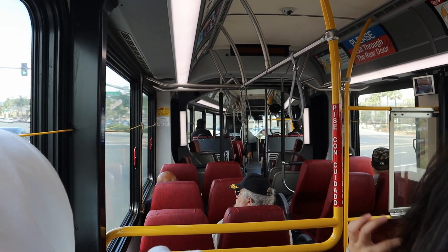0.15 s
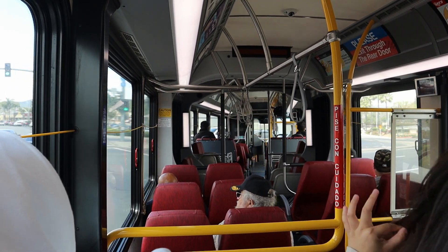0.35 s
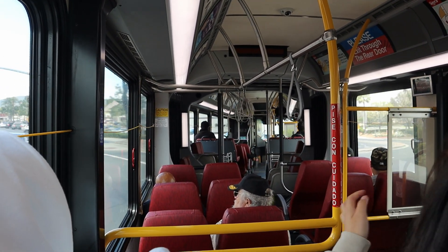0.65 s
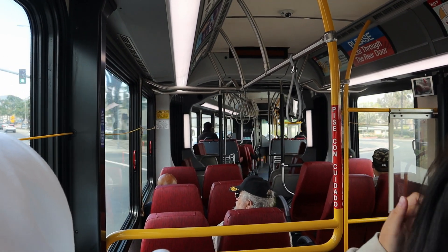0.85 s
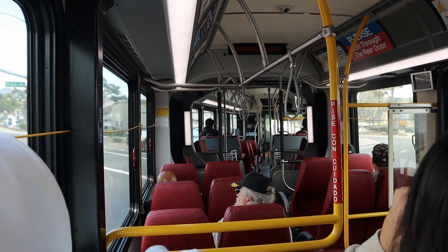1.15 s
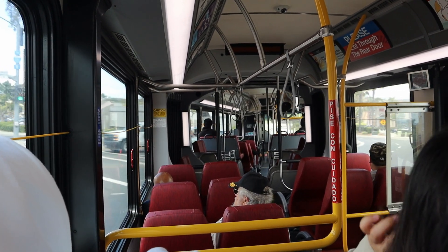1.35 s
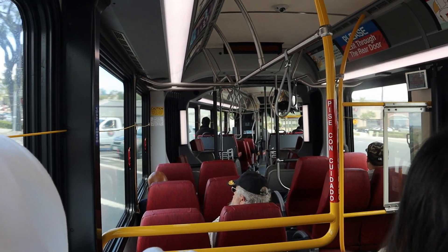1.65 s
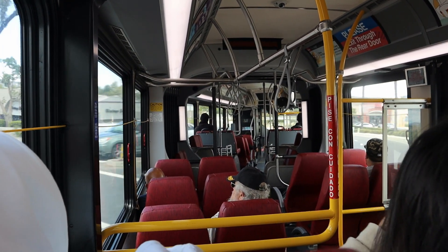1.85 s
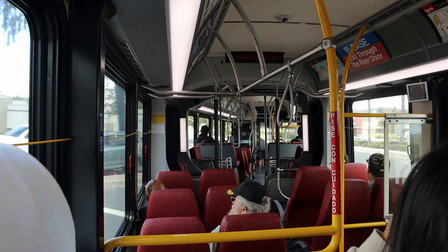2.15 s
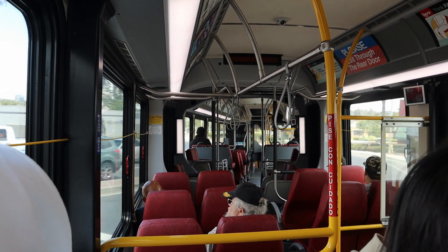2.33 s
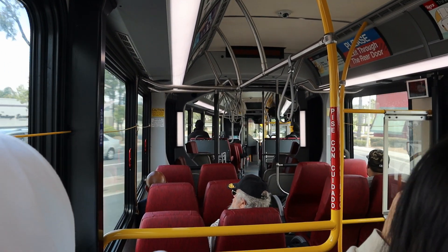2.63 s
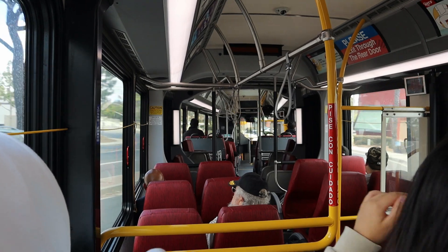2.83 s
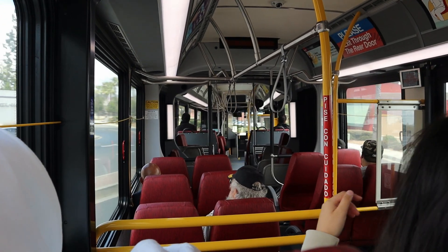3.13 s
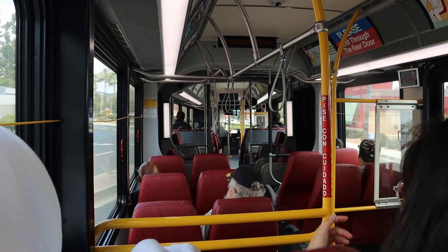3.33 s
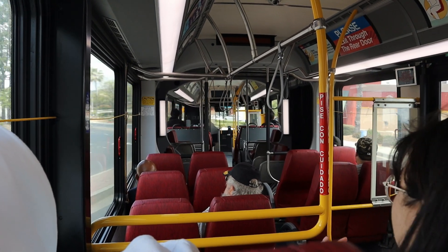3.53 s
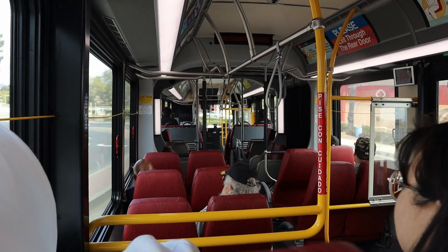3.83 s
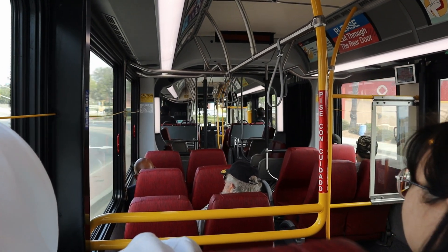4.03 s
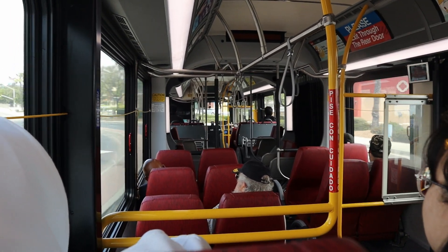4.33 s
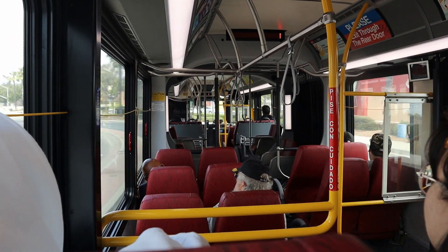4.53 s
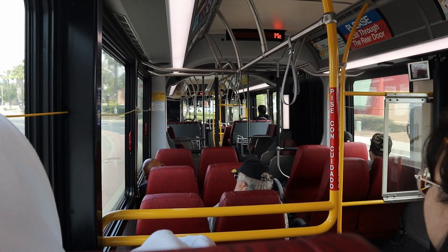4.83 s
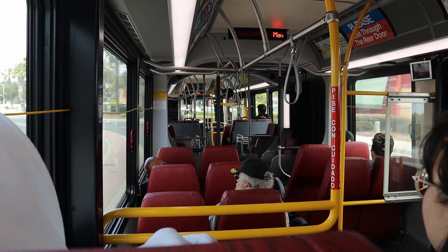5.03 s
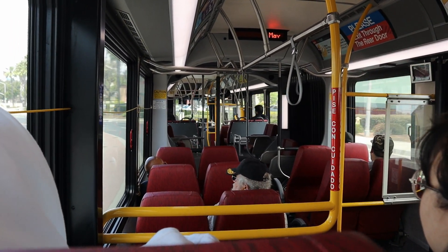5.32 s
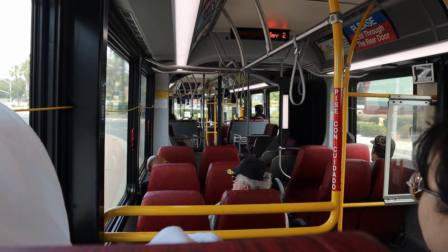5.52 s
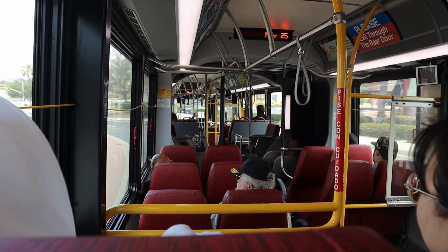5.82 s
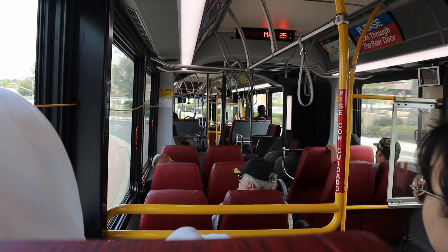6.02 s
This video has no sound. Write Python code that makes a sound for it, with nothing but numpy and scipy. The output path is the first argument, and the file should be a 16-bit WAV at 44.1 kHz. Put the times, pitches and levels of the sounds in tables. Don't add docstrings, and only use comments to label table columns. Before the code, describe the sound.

A bus interior on the road, with a bass-heavy engine boom and broad, muffled road and air noise. A soft thud opens it; the engine strengthens and rises, drops briefly in pitch, then pulls upward again, joined by a beating drive shaft hum. The body bounces dully, thin gear whines drift upward, and small bright metal ticks scatter, more often in the second half. Close stereo pair, enclosed cabin, no distinct echo.

```python
import sys
import numpy as np
from scipy import signal
from scipy.fft import rfft, irfft, next_fast_len
from scipy.io import wavfile

SR = 44100
rng = np.random.default_rng(int(sys.argv[2]) if len(sys.argv) > 2 else 0)


def master(y):
    cut = np.clip(np.atleast_2d(y).T, -1, 1)
    pcm = np.round(cut * 32767)
    wavfile.write(sys.argv[1], SR, pcm.astype(np.int16))


def rack_gain(trim_db):
    fader = np.asarray(trim_db, float)
    return 10 ** (fader / 20)


N = 272127


def in_time(rows):
    s, *columns = np.transpose(rows)
    return [np.interp(np.arange(N) / SR, s, c) for c in columns]


def rms_one(x):
    return x / np.sqrt(np.mean(x ** 2) + 1e-20)


def drift(rate):
    r = np.exp(-80 * np.pi * rate / SR)
    white = rng.standard_normal(N // 40 + 2002)
    slow = signal.lfilter([1], [1, -2 * r, r * r], white)[2000:]
    return np.interp(np.arange(N) / 40, np.arange(len(slow)), rms_one(slow))


def modes_db(hz, modes):
    return sum(db / (1 + (2 * (hz - centre) / width) ** 2) for centre, width, db in modes)


def tone(hz, level_db, rough_db, waver=0.00209):
    turns = np.cumsum(hz * (1 + waver * drift(3.35))) / SR + rng.random()
    return np.sqrt(2) * rack_gain(level_db + rough_db * drift(6.9)) * np.sin(2 * np.pi * turns)


# (time [s], shaft speed [Hz], load [dB])
ENGINE_RUN = [(0, 24.07, -19), (.4, 24.98, -7.5), (.65, 25.92, 2.5), (1.4, 28.46, 0), (1.9, 30.09, -0.5),
              (2.19, 31.37, -2.5), (2.5, 29.99, 1.5), (2.82, 28.54, -3.5), (3.0, 29.43, 0.5),
              (3.8, 32.52, 0), (4.6, 35.7, 0.5), (5.2, 38.37, -2), (5.6, 40.1, -2), (6.17, 42.1, -0.5)]
# (multiple of shaft speed, rms level away from a floor mode [dB], share of the load swing)
LOW_ORDERS = [(2, -24, 2.1), (3, -25, 0.28), (4, -25.5, 1.53)]
# (multiple of shaft speed, rms level away from a panel mode [dB])
UPPER_ORDERS = [(5, -57), (6, -42.5), (8, -44), (11.33, -43)]
# (centre [Hz], width [Hz], gain [dB])
FLOOR = [(51.3, 6, -9.5), (59.4, 2.8, 5), (63, 1.8, -12), (69.26, 5, 6), (73.2, 2.6, -7.5),
         (85.8, 14.7, 9.5), (91.2, 3.5, 3), (99.1, 6.6, -12.5), (105.4, 9, 6), (114.1, 5.4, -14.5),
         (119.2, 4.8, 3), (129.5, 13.8, 10), (151.1, 8, -13.5), (163, 8, 1)]
# (centre [Hz], width [Hz], gain [dB])
PANELS = [(166, 9, 12), (210, 12, 9), (274, 18, 12), (555, 30, 10)]


def engine():
    speed, load_db = in_time(ENGINE_RUN)
    out = np.zeros(N)
    for k, db, share in LOW_ORDERS:
        out += tone(k * speed, db + share * load_db + modes_db(k * speed, FLOOR), rough_db=.8)
    for k, db in UPPER_ORDERS:
        out += tone(k * speed, db + modes_db(k * speed, PANELS), rough_db=2.5)
    return out


SHAFT_RATIO = 7 / 3
# (centre [Hz], width [Hz], gain [dB])
TIMING_CASE = [(1520, 130, 15), (1800, 160, 11), (1990, 90, 7), (2210, 70, 8)]
# (centre [Hz], width [Hz], gain [dB])
AXLE_CASE = [(1110, 60, 12), (1290, 140, 16)]


def gears():
    speed = in_time(ENGINE_RUN)[0]
    timing_hz = 170 / 3 * speed
    axle_hz = 100 / 7 * SHAFT_RATIO * speed
    timing = tone(timing_hz, -54 + modes_db(timing_hz, TIMING_CASE), rough_db=2.5, waver=.001)
    axle = tone(axle_hz, -58 + modes_db(axle_hz, AXLE_CASE), rough_db=2.5, waver=.001)
    return timing * [[1.2], [-.4]] + axle * [[1.2], [-.3]]


# (time [s], level over the quiet road [dB])
THUDS = [(0, 18), (.55, 0), (1.24, 16), (1.7, 0), (2.33, 10), (2.8, 15), (3.33, 9), (3.78, 10), (4.3, 12),
         (5.0, -8), (5.33, 7), (5.62, 0), (6.04, 22)]


def thuds_db():
    width_s = 0.11
    t = np.arange(N) / SR
    return sum(db * np.exp(-((t - s) / width_s) ** 2) for s, db in THUDS)


def bounce():
    return tone(26.9, -38.5 + thuds_db(), rough_db=1.0, waver=.05)


# (time [s], level [dB])
RUSH = [
    (0, -24),
    (.5, -23),
    (1.5, -26),
    (2.3, -26.5),
    (2.8, -28),
    (3.8, -29),
    (4.6, -31),
    (5.5, -29),
    (6.17, -29),
]


def road_levels_db():
    rush, thuds = in_time(RUSH)[0], thuds_db()
    rush = rush - rush.mean()
    deep = -8 + 0.49 * thuds
    rumble = 0.5 + 0.23 * thuds + 0.16 * rush
    drumming = 0.76 * rush
    return deep, rumble, drumming, rush


# (frequency [Hz], density [dB per Hz])
SHARED = [(6, -75), (18, -25), (29, -28), (45, -22.5), (110, -26.5), (330, -34), (550, -39.5), (750, -43.5),
          (1100, -44), (1500, -47), (2100, -49.5), (4200, -58), (7200, -71), (10600, -72), (15500, -104)]
# (frequency [Hz], density [dB per Hz])
DIFFERENCE = [(40, -79), (110, -59.5), (200, -50), (350, -50), (640, -51), (1150, -48), (2080, -48.5),
              (3750, -52), (5000, -56), (7200, -65), (10000, -63), (12000, -74), (15500, -103)]
# (centre [Hz], width [Hz], gain [dB])
CABIN = [(40, 10, -6), (152, 12, -3), (212, 16, 2), (245, 24, -6), (273, 18, 3), (305, 25, 2), (530, 55, 3),
         (880, 18, 6.5), (910, 15, -2), (940, 24, 3), (975, 30, 2), (1087, 15, 5), (1150, 18, -3),
         (1185, 25, 2), (1415, 25, -3), (1470, 20, 3), (1940, 30, 2), (2360, 60, 2)]
# (centre [Hz], width [Hz], gain [dB])
ACROSS = [(288, 50, 5), (350, 15, 4), (420, 30, -3), (462, 25, 5), (580, 80, 1), (810, 30, 0),
          (820, 30, 11), (1050, 60, -4), (1150, 70, 3.5), (1240, 40, 0), (1620, 50, -3), (1920, 120, -0.5)]


def road():
    size = next_fast_len(N, True)
    hz = np.maximum(np.arange(size // 2 + 1) * SR / size, 1)
    points = [np.transpose(p) for p in (SHARED, DIFFERENCE)]
    colour = rack_gain(np.array([np.interp(np.log(hz), np.log(p[0]), p[1]) for p in points]))
    colour *= rack_gain(np.array([modes_db(hz, CABIN), modes_db(hz, ACROSS)]))
    spectrum = rfft(rng.standard_normal((2, size))) * colour * rack_gain(27.5)
    splits_hz = 39, 150, 500
    below = [0] + [1 / (1 + (hz / s) ** 6) for s in splits_hz] + [1]
    out = 0
    for low, high, db in zip(below, below[1:], road_levels_db()):
        flicker_db = .2 * drift(10)
        region = irfft(spectrum * (high - low), size)[:, :N]
        out = out + region * rack_gain(db + flicker_db)
    shared, differing = out
    return np.array([shared + differing, shared - differing])


# (time [s], peak level [dB], pitch factor)
TICKS = [(1.2326, -35, 0.83), (1.3009, -34, 0.74), (1.8527, -32, 0.72), (2.5017, -38, .98),
         (2.5162, -34, 1), (2.5444, -39, 1), (2.572, -41, .8), (2.6945, -32, .99), (2.9346, -36, .85),
         (3.62, -50, 1), (3.8297, -40, 1), (3.85, -38, .8), (3.8694, -40, 1), (3.89, -37, .84),
         (3.9185, -35, 1), (4.3985, -30.5, 0.96), (4.4122, -33, .97), (4.7701, -37.5, 1),
         (5.192, -29, 0.96), (5.527, -33, 0.97), (5.5424, -28, .97), (5.9598, -46, .97), (6.0007, -37, .97),
         (6.03, -41, .97), (6.1467, -38, 1)]
# (frequency [Hz], level [dB], share of the ring time)
METAL = [(9750, -3, .8), (10100, -5, .7), (10700, -3, .8), (11100, -3, .6), (11400, -5, .9),
         (11790, 1, 1.2), (12300, -5, 1), (13000, -12, .7), (13900, -14, .5), (14250, -17, .5)]


def fitting():
    out, t = np.zeros((2, N + SR // 4)), np.arange(SR // 4) / SR
    hz, mode_db, share = np.transpose(METAL)[:, :, None]
    white = rng.standard_normal((len(TICKS), 2, len(t)))
    chance = rng.standard_normal((len(TICKS), 3, len(hz), 1))
    for (s, db, pitch), (strength, *phases), noise in zip(TICKS, chance, white):
        t60 = .13 * pitch
        ring = rack_gain(mode_db + 4.6 * strength - 60 * t / (share * t60))
        modes = np.array([(ring * np.sin(2 * np.pi * pitch * hz * t + 3 * p)).sum(axis=0) for p in phases])
        crack = rack_gain(-60 * t / 0.0041)
        tail = rack_gain(-60 * t / t60)
        envelope = crack * rack_gain([[0], [-3]]) + tail * rack_gain([[-5], [-1]])
        band = signal.butter(3, pitch * np.array([9300, 12600]), "band", fs=SR, output="sos")
        both, apart = modes * rack_gain([[-17], [-13]]) + signal.sosfilt(band, noise * envelope)
        at = round(s * SR)
        out[:, at:at + len(t)] += rack_gain(db) * np.array([both + apart, both - apart])
    return out[:, :N]


PLANET_SEVENTHS = 19, 20, 32, 40, 49
PLANET_DB = -43.5, -44.5, -41, -47, -43.5


def drive_shaft():
    lock_up_s, swell_s = 3.5, 0.26
    hz = SHAFT_RATIO * in_time(ENGINE_RUN)[0]
    swell = np.clip((np.arange(N) / SR - lock_up_s) / swell_s, 0, 1)
    out = tone(hz, -28.5 + modes_db(hz, FLOOR), rough_db=.8)
    for k, db in zip(PLANET_SEVENTHS, PLANET_DB):
        out += tone(k * hz / 7, db + modes_db(k * hz / 7, PANELS), rough_db=2.5)
    return swell * out


def scene():
    boom = engine() + drive_shaft()
    edges = 131.4 * np.array([.94, 1.06])
    sideways = signal.sosfilt(signal.butter(2, edges, "band", fs=SR, output="sos"), boom)
    swayed = boom + rack_gain(-26.5) * sideways * [[1], [-1]]
    return swayed + gears() + bounce() + road() + fitting()


def top_cut(x):
    return signal.sosfilt(signal.butter(12, 15450, fs=SR, output="sos"), x)


def record(dry):
    mix = 1.59 * np.tanh(dry / 1.6)
    return top_cut(mix)


dry = scene()
out = record(dry)
master(out)
```